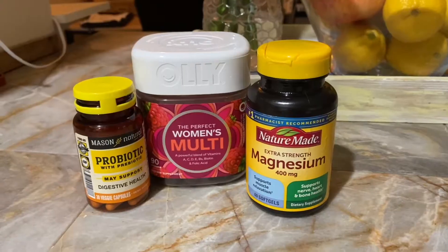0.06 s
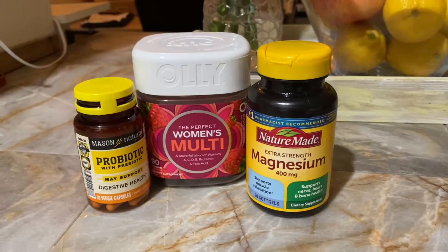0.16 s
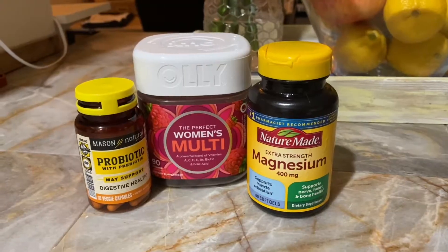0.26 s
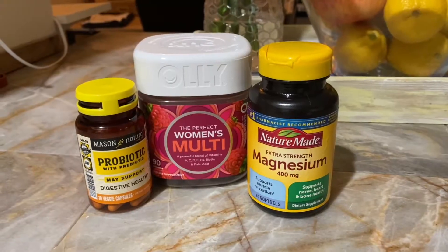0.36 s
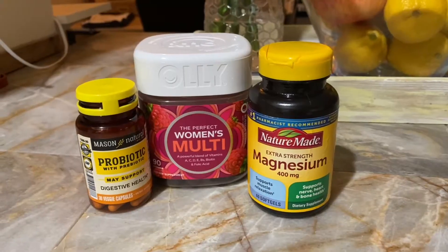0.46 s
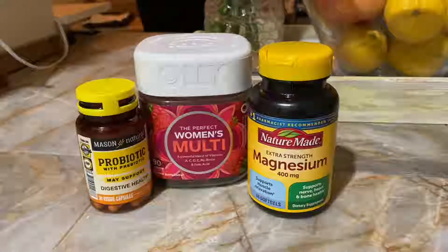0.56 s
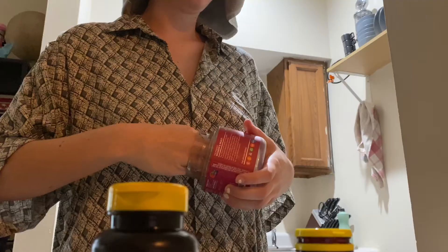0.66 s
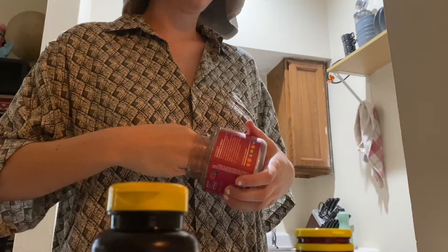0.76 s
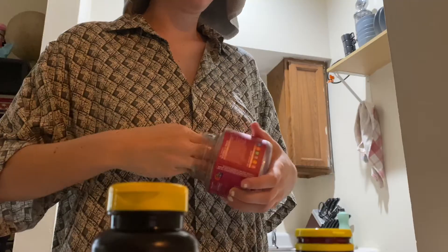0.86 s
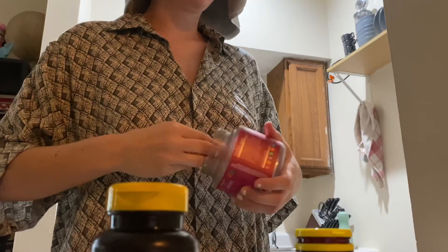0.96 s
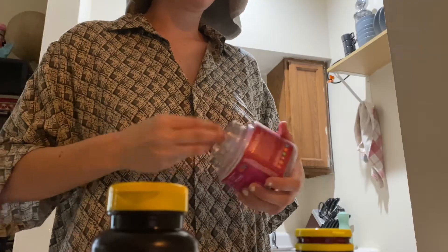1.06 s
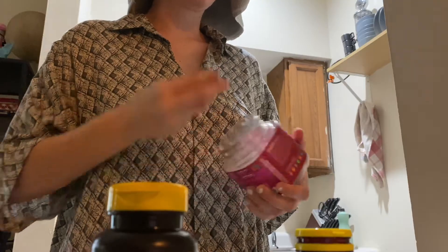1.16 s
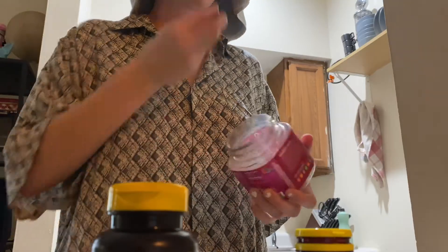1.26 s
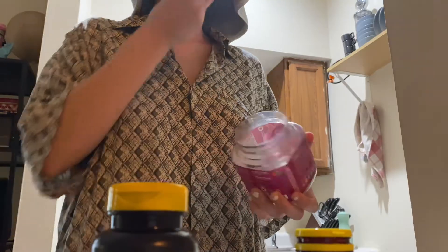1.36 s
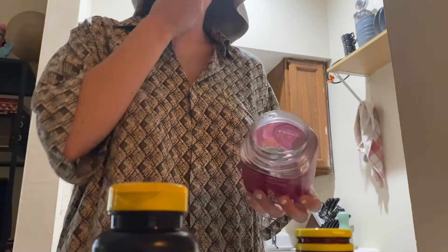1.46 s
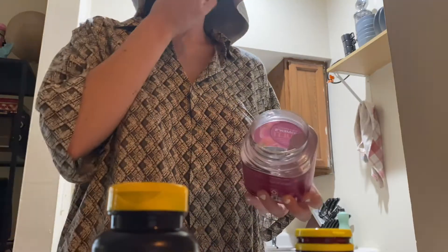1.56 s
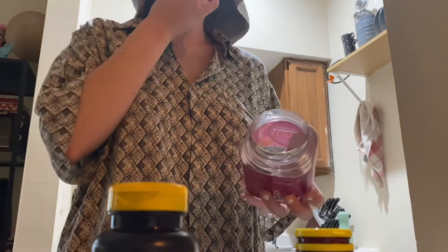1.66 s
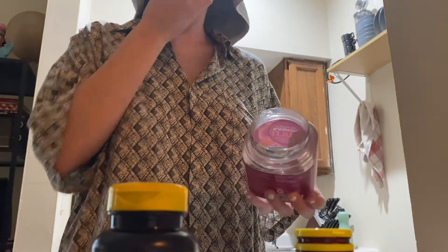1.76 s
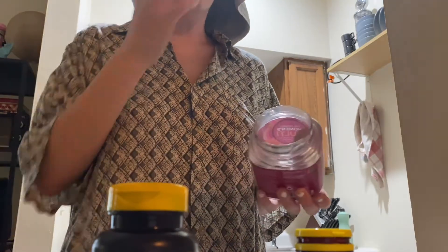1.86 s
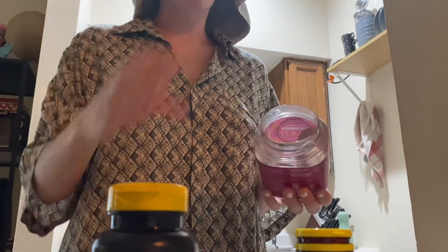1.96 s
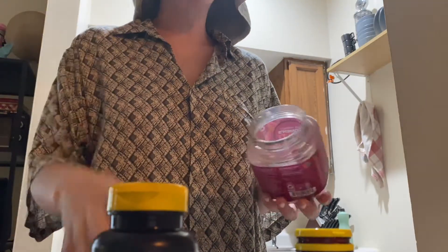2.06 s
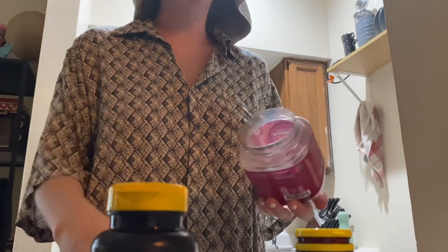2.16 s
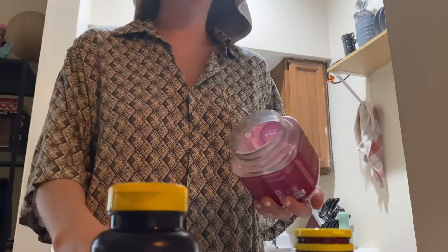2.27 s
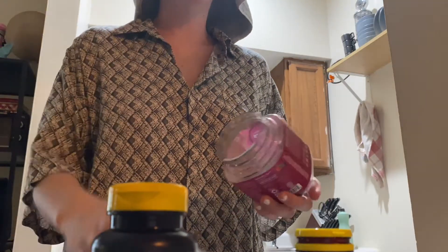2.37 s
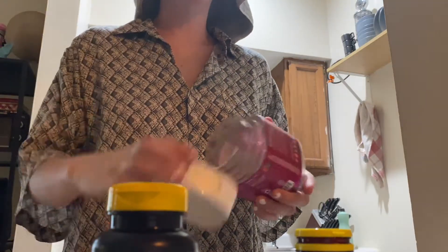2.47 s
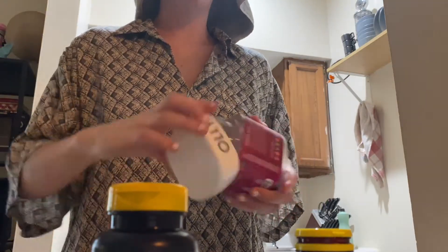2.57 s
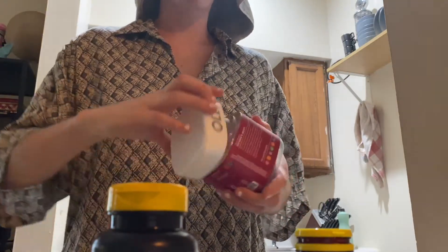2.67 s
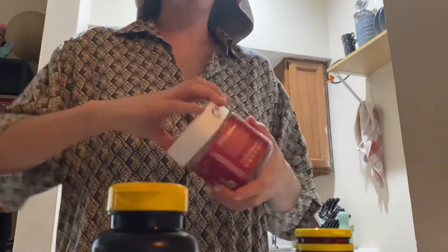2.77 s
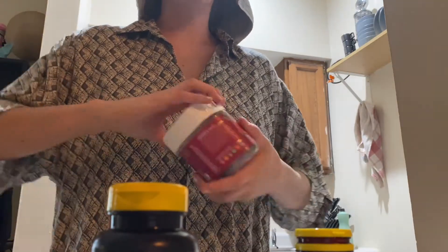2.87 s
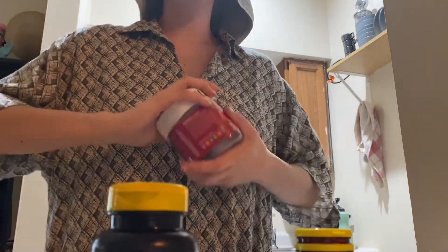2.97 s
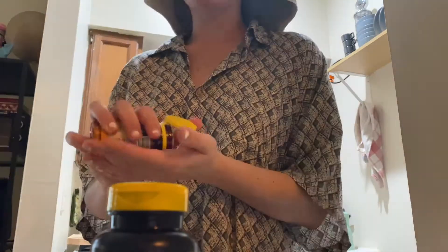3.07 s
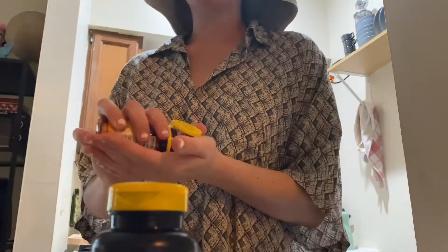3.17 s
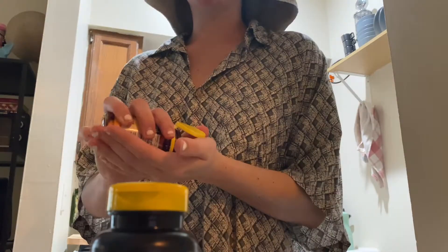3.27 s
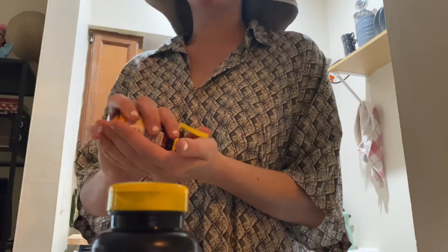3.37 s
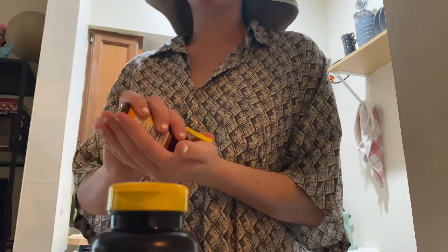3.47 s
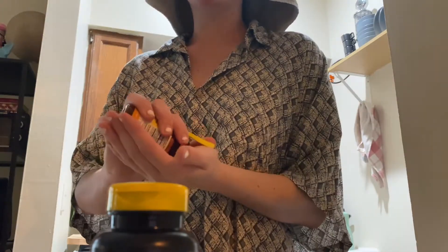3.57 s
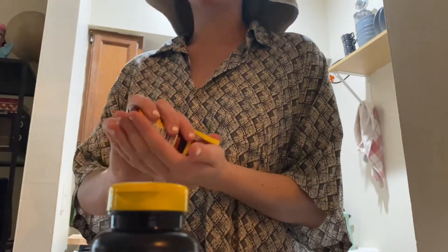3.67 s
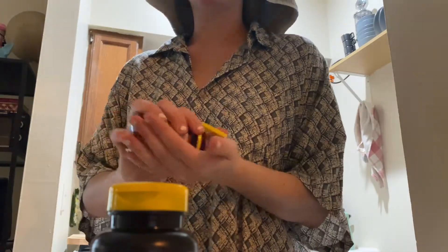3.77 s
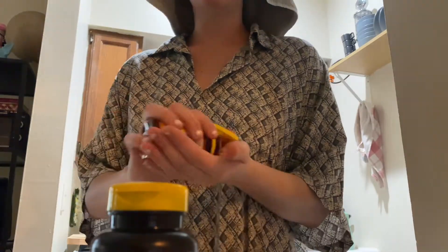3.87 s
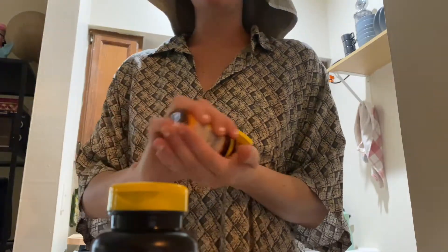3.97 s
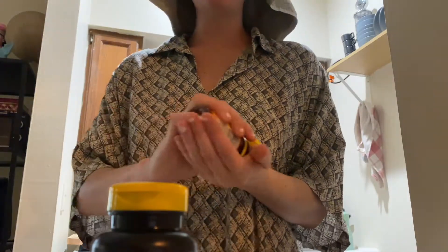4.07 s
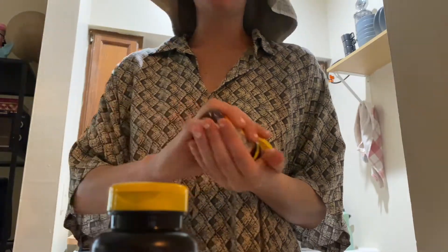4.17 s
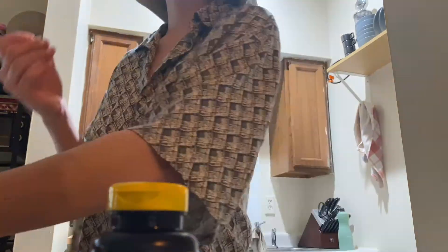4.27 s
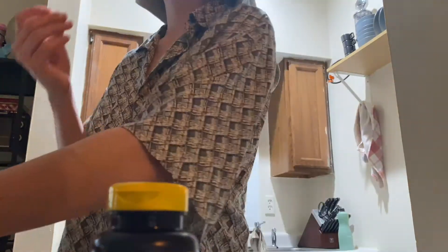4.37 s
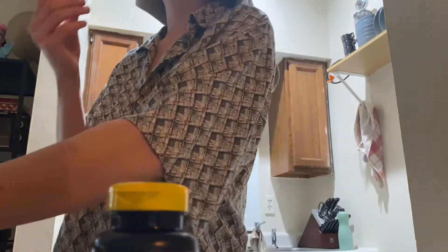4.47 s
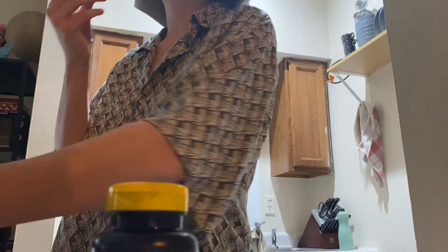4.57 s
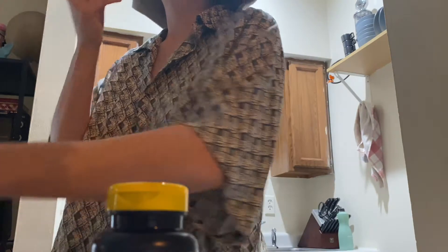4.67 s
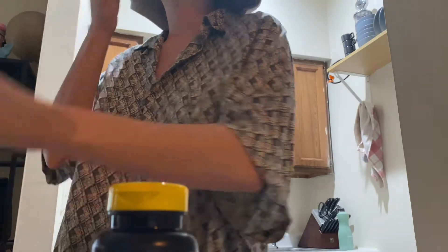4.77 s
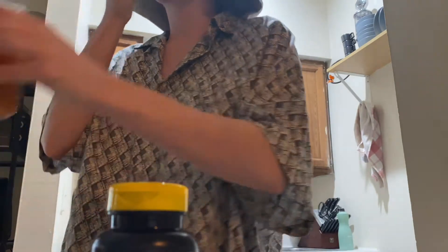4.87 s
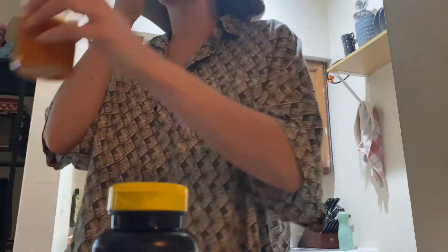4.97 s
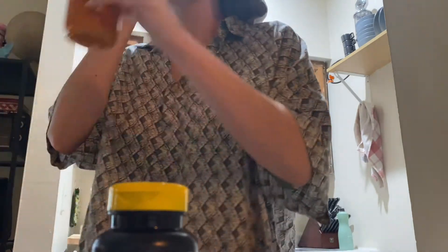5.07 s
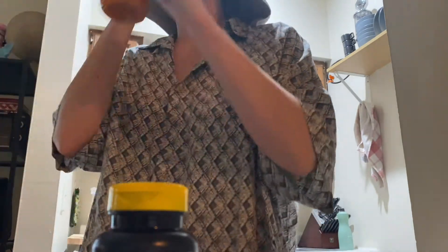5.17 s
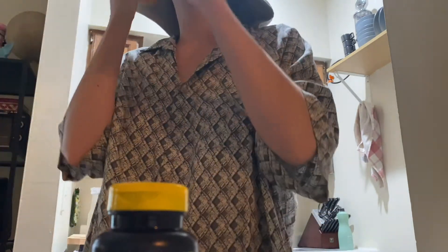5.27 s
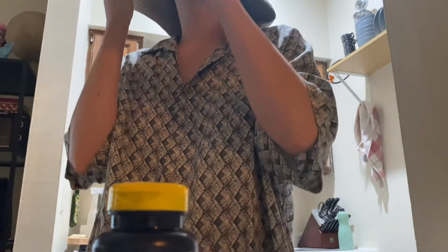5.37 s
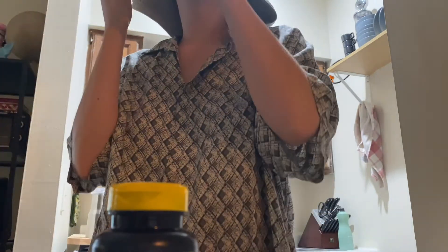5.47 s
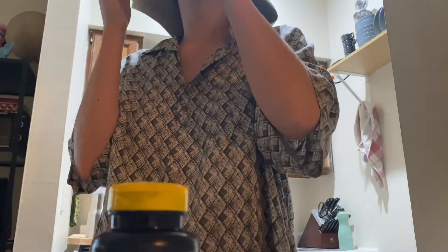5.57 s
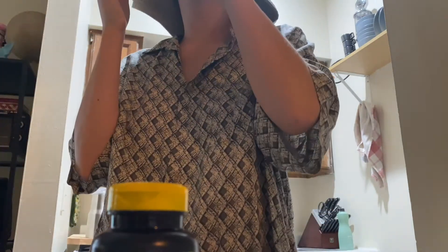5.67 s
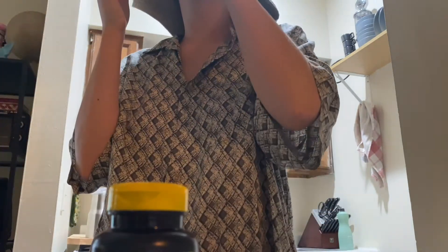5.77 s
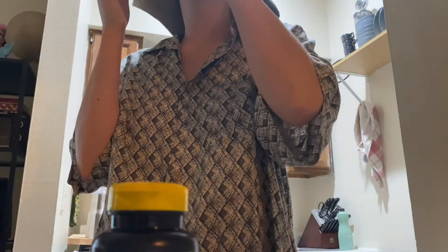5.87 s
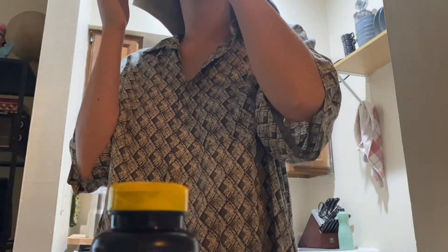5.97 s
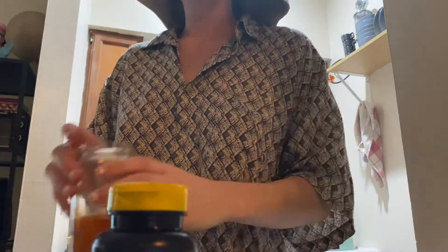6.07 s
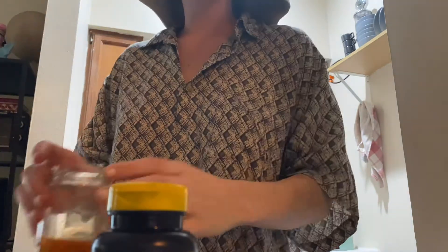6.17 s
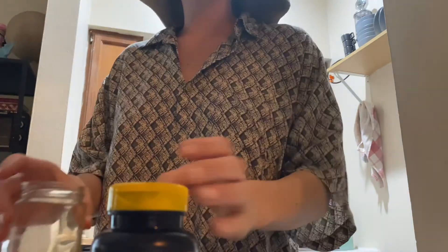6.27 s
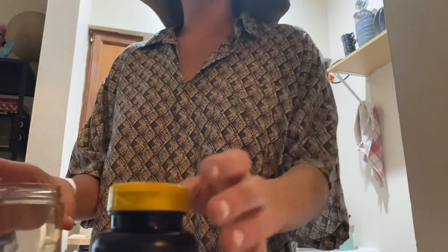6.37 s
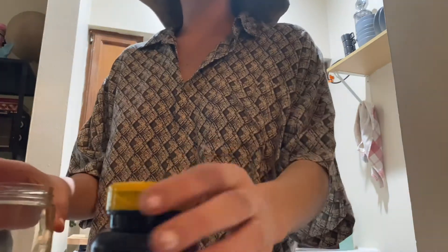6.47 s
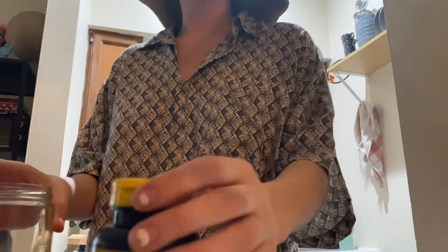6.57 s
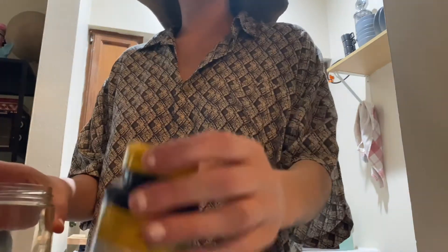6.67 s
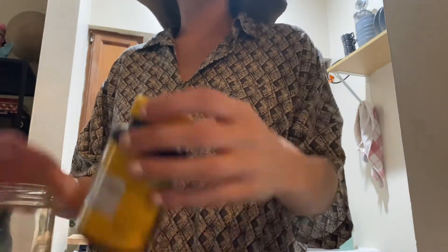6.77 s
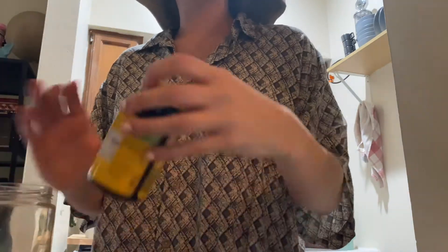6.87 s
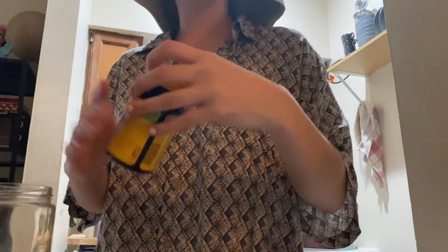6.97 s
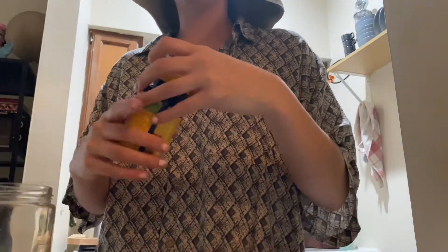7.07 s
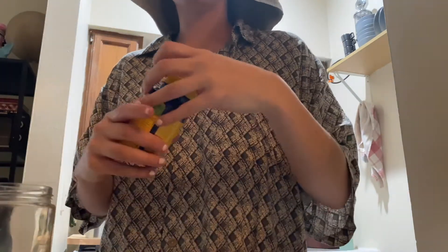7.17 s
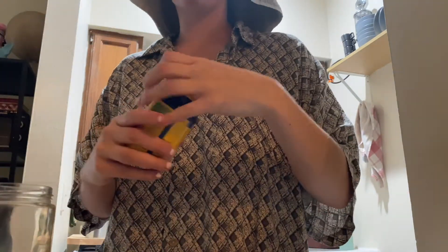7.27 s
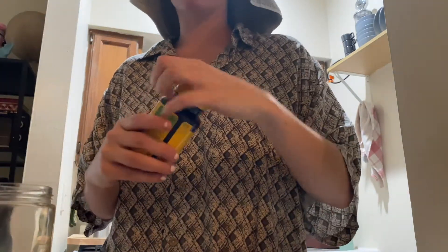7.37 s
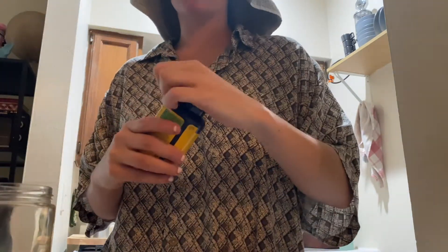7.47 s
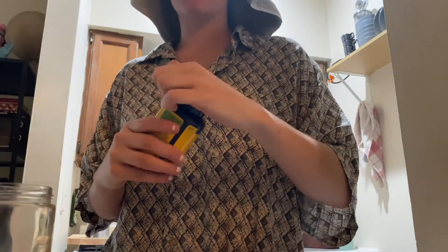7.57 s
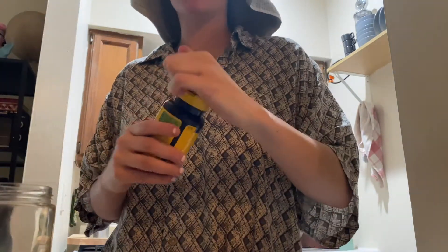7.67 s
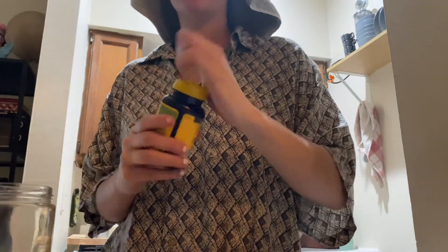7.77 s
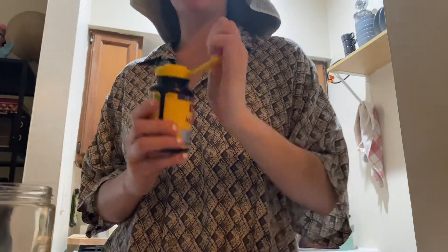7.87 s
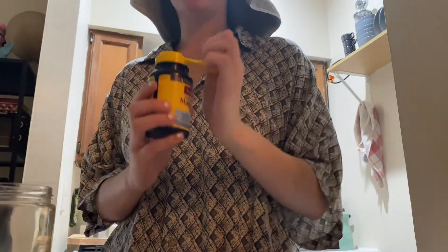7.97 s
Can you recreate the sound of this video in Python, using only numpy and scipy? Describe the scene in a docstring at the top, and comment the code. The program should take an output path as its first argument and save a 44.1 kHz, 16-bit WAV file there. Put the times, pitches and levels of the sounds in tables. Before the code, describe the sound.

Very quiet hissy air with faint cloth swishes; at about 0.57 s it switches abruptly to a fuller room tone with low, slightly wavering hum. Soft rubbing and deep bumps of a held plastic jar follow, with small hollow knocks around 1.6-2.2 s. At 2.44 s a lid claps on, loud and hollow, followed by knocks and threaded rubbing until about 2.9 s. From 3.0 s pills click and slide in a plastic bottle with a faint airy hollow tone, a clearer knock at 3.7 s. At 4.25 s a glass leaves stone with a dull scrape and thud, then near quiet. At 6.25 s it lands very hard: loud, slightly distorted clunk, boom, rattle, faint bright rim ring and a smaller settling bump at 6.4 s. Light pill ticks around 7 s, a sharp flip-cap snap at 7.55 s, then small rubs. Close stereo microphones, short kitchen reverberation.

```python
"""Quiet hissy kitchen air and cloth swishes; at 0.57 s the room tone switches to a fuller one: noise bands
plus wavering hum tones. Plastic jars are handled over stone, a lid claps on at 2.4 s: wall modes, crack,
gliding air tone, thumps. Pills click and slide at 3 s: filtered bursts, slip grains, noise-driven bottle air.
From 4.2 s a glass is lifted, at 6.25 s set down hard: modes, slab rattle, boom. Pills click again, a flip
cap snaps open at 7.5 s. Echoes and a diffuse tail reach two microphones; the loudest peaks clip."""
import sys
import numpy as np
from scipy import signal
from scipy.fft import rfft, irfft, next_fast_len
from scipy.io import wavfile

SR = 44100
rng = np.random.default_rng(int(sys.argv[2]) if len(sys.argv) > 2 else 0)


def log_audio(samples):
    """Write samples as a 16-bit WAV file to the path given in sys.argv[1]."""
    # one column per channel
    frames = np.atleast_2d(samples).T
    # limit to full scale, then quantise
    limited = np.clip(frames, -1, 1)
    pcm = np.round(limited * 32767).astype(np.int16)
    wavfile.write(sys.argv[1], SR, pcm)


N = 354123
T = np.arange(int(.5 * SR)) / SR  # time axis of one event
ATTACK = int(.015 * SR)  # samples over which event level is set


def amp(db):
    """Decibels to gain."""
    return 10 ** (np.asarray(db) / 20)


def unit(x, count=None):
    """Scale to rms 1 over the first count samples."""
    return x / np.sqrt(np.mean(x[:count] ** 2) + 1e-18)


def fade(t, t60):
    """Exponential decay, -60 dB at t60."""
    return np.exp(-np.log(1000) * t / t60)


def add(track, s, x):
    """Mix x into the track at s seconds."""
    i = max(int(s * SR), 0)
    track[i:i + len(x)] += x[:max(len(track) - i, 0)]


def band(x, hz, q):
    """One broad resonance."""
    hz = min(hz, SR / 3)
    return signal.lfilter(*signal.iirpeak(hz, max(q, 3 * hz / SR), fs=SR), x)


def soften(x, hz):
    """Low-pass: a soft contact lasts longer and leaves out the treble."""
    return signal.lfilter(*signal.butter(2, min(hz, SR / 3), fs=SR), x)


def thin(x, hz=62):
    """High-pass: small objects radiate almost no deep bass."""
    return signal.sosfilt(signal.butter(3, hz, "high", fs=SR, output="sos"), x)


def colour(x, points):
    """Causal minimum-phase filter through (f/Hz, level/dB) points."""
    hz, db = np.transpose(points)
    size = 4096
    grid_hz = np.fft.rfftfreq(size, 1 / SR)
    log_gain = np.log(amp(np.interp(np.log(grid_hz + 1), np.log(hz), db)))
    cepstrum = irfft(log_gain)[:size // 2]
    cepstrum[0] /= 2
    response = irfft(np.exp(rfft(2 * cepstrum, size)))
    return signal.fftconvolve(x, response)[:len(x)]


def ring(modes, scatter=0):
    """Damped modes of alternating sign; scatter is the relative random pitch shift by the grip."""
    out = 0
    for k, (hz, db, t60) in enumerate(modes):
        shifted_hz = hz * (1 + scatter * rng.standard_normal())
        out = out + (-1) ** k * amp(db) * fade(T, t60) * np.sin(2 * np.pi * shifted_hz * T)
    return out


def burst(t60):
    """Noise that dies away."""
    return rng.standard_normal(len(T)) * fade(T, t60)


def thud(modes, rise_s=.003):
    """Low modes set going by a soft push."""
    return unit(ring(modes) * (1 - np.exp(-T / rise_s)), ATTACK)


def friction(length, rate, spread_db):
    """A stroke of tiny slips (rate/s) of uneven size that swells and ebbs, then silence."""
    count = max(int(length * SR), ATTACK)
    slips = (rng.random(count) < rate / SR) * rng.standard_normal(count)
    slips = slips * amp(spread_db * np.minimum(rng.exponential(size=count), 3))
    return np.pad(slips * np.sqrt(np.hanning(count)), (0, len(T))), count


def air_noise(spectrum, db, shared_hz=330):
    """Steady air noise, level set above 200 Hz; the bass is alike on both sides."""
    bass = soften(rng.standard_normal(N), shared_hz)
    own = signal.lfilter(*signal.butter(2, shared_hz, "high", fs=SR), rng.standard_normal((2, N)))
    air = np.array([colour(bass + side, spectrum) for side in own])
    above_hum = signal.sosfilt(signal.butter(6, 200, "high", fs=SR, output="sos"), air)
    return amp(db) * air / above_hum.std()


# hissy opening air: f/Hz, relative density/dB
OPENING_SPECTRUM = [(18, -39), (30, -15), (73, 5), (185, -13), (837, -26), (1030, -14.5), (1110, -5.5),
                    (1480, -29), (2080, -27), (2310, -25), (2920, -43), (3500, -35), (3980, -37),
                    (7240, -31), (15000, -47)]
# room air with hum: f/Hz, relative density/dB
AIR_SPECTRUM = [(15, -53.5), (25, -24.5), (48, -20.5), (70, -5.5), (100, -12.5), (130, -10), (153, -15.5),
                (249, -24), (277, -28.5), (326, -22.5), (394, -31), (840, -34.5), (988, -25.5),
                (1290, -53.5), (10100, -52), (16000, -83.5)]
# hum tones: f/Hz, level/dB before HUM_DB
HUM_TONES = [(80.7, -68.5), (84, -64.5), (123.8, -58.5), (247.6, -78), (985, -78)]
# brief dips of the room tone: t/s
DIP_TIMES_S = [3.0, 4.205, 6.0]
OPENING_DB, AIR_DB = -66.5, -66.5  # AIR_DB before HUM_DB
HUM_START_S, HUM_DB = .57, 2  # switch time, gain of the whole fuller room tone
DIP_WIDTH_S, DIP_DB = 0.016, -17.5


def room_tone(whir_hz=1110, whir_q=5, whir_db=-72, hiss_hz=1950, hiss_q=2, hiss_db=-82):
    """Quiet hissy air, then fuller air with hum tones, whir and hiss bands; the level dips briefly."""
    t = np.arange(N) / SR
    whir = rng.standard_normal((2, N))
    for _ in range(2):
        whir = band(whir, whir_hz, whir_q)
    whir = np.array([unit(side) for side in whir])
    hum = 0
    for hz, db in HUM_TONES:
        wander_rad = 0.23 * unit(soften(rng.standard_normal(N), 3))
        hum = hum + amp(db) * np.sqrt(2) * np.sin(2 * np.pi * hz * t + wander_rad)
    hiss = rng.standard_normal((2, N))
    for _ in range(3):
        hiss = band(hiss, hiss_hz, hiss_q)
    hiss = np.array([unit(side) for side in hiss])
    switch = np.clip((t - HUM_START_S) / 0.0085, 0, 1)
    dips = sum(np.exp(-((t - s) / DIP_WIDTH_S) ** 2) for s in DIP_TIMES_S)
    course = switch * amp(HUM_DB + DIP_DB * dips)
    opening = air_noise(OPENING_SPECTRUM, OPENING_DB) * (1 - switch)
    tones_and_bands = amp(whir_db) * whir + amp(hiss_db) * hiss + hum
    return opening + course * (air_noise(AIR_SPECTRUM, AIR_DB) + tones_and_bands)


# kitchen reverberation bands: f/Hz, t60/s, level/dB before late_db
ROOM_BANDS = [(100, 0.46, -8.5), (308, 0.53, -7.5), (700, 0.83, -17), (1400, 0.24, -13), (2323, 0.44, -9.5),
              (3200, .5, -13), (5996, 0.38, -10.5), (14000, 0.88, -17)]


def kitchen(apart_hz=700):
    """Diffuse decaying noise at two microphones; long waves reach both alike."""
    t, hz = np.arange(SR) / SR, np.fft.rfftfreq(SR, 1 / SR)
    centres = np.log([row[0] for row in ROOM_BANDS])
    mid, side = rfft(rng.standard_normal((2, SR)))
    likeness = np.exp(-(hz / apart_hz) ** 2)
    noise = mid * np.sqrt((1 + likeness) / 2) + np.array([side, -side]) * np.sqrt((1 - likeness) / 2)
    tail = 0
    for share, (_, t60, db) in zip(np.eye(len(ROOM_BANDS)), ROOM_BANDS):
        shape = fade(t, t60) * np.clip((t - .006) / .015, 0, 1)
        banded = irfft(noise * np.interp(np.log(hz + 1), centres, share), SR)
        tail = tail + amp(db) * banded * shape / np.linalg.norm(shape)
    return tail


def place(x, lag, pan_db, early_db, late_db, early_t60=.1, count=40):
    """Direct sound, quick echoes off counter and cupboards, then the tail; lag is left delay in samples."""
    hz = np.fft.rfftfreq(SR, 1 / SR)
    left = irfft(np.exp(-2j * np.pi * hz * (lag + 1) / SR), SR) * amp(pan_db / 2)
    right = signal.unit_impulse(SR, 1) * amp(-pan_db / 2)
    direct = np.array([left, right])
    direct[:, SR // 2:] = 0
    echoes = np.zeros((2, SR))
    for when, bearing, size in rng.uniform(-1, 1, (count, 3)):
        s = .002 + .02 * (when + 1)
        echo = np.array([np.sign(size) * fade(s, early_t60)])
        for side, extra_s in zip(echoes, (0, bearing * 0.00064)):  # each echo has its own direction
            add(side, s + extra_s, echo)
    early = amp(early_db) * echoes / np.linalg.norm(echoes[0])
    response = direct + early + amp(late_db) * kitchen()
    return signal.fftconvolve(x[None], response, axes=1)[:, :N]


def standing_wave(pair, radians, hz, octaves):
    """A standing wave over the counter turns the phase between the microphones in one low band."""
    size = next_fast_len(N + len(T))
    distance = np.log2((np.fft.rfftfreq(size, 1 / SR) + 1) / hz) / octaves
    turn = radians * np.exp(-distance ** 2)
    return irfft(rfft(pair, size) * np.exp(.5j * np.array([turn, -turn])), size)[:, :N]


# Event levels below are before place().
# soft dull rustles: t/s, rise/s, t60/s, level/dB
RUSTLE_EVENTS = [(0.564, 0.029, 0.69, -50), (.9, 0.072, 1, -55.5), (1.735, 0.028, 0.42, -29.5),
                 (2.49, 0.036, 0.67, -35.5), (2.645, 0.051, 0.076, -32)]
# rustle spectrum: f/Hz, relative level/dB
RUSTLE_SPECTRUM = [(40, -2.5), (100, 4), (200, 5.5), (400, 7), (900, 5), (1500, -9), (2400, -16.5),
                   (4000, -38.5), (12000, -43)]
# soft deep bumps: t/s, level/dB
BUMP_EVENTS = [(.985, -40), (1.776, -34), (1.905, -35.5), (1.959, -36.5)]
# the lid seats and the whole jar thumps in the hand: t/s, f/Hz, level/dB
THUMP_EVENTS = [(2.441, 352, -34.5), (2.51, 383, -25.5), (2.654, 303, -25.5), (2.685, 228, -35),
                (7.546, 203, -31), (7.552, 363, -36.5)]
BUMP_HZ, BUMP_T60_S, THUMP_T60_S = 92, .23, .035


def handling():
    """Dull rustles as shaped noise; bumps and jar thumps as damped low modes."""
    out = np.zeros(N)
    for s, rise, t60, db in RUSTLE_EVENTS:
        swell = np.minimum(T / rise, 1) * fade(np.maximum(T - rise, 0), t60)
        rustle = unit(colour(rng.standard_normal(len(T)), RUSTLE_SPECTRUM))
        add(out, s, amp(db) * swell * rustle)
    for s, db in BUMP_EVENTS:
        add(out, s, amp(db) * thud([(BUMP_HZ, 0, BUMP_T60_S)], rise_s=.008))
    for s, hz, db in THUMP_EVENTS:
        add(out, s, amp(db) * thud([(hz, 0, THUMP_T60_S)]))
    return out


# contact crack of plastic, also for ticks and knocks: f/Hz, relative level/dB
CRACK_SPECTRUM = [(200, 3), (900, 10.5), (2500, -1.5), (5000, -5.5), (7500, -2), (10000, -4), (14500, -8.5),
                  (16000, -18.5)]
# sleeves swishing: start t/s, length/s, level/dB, centre f/Hz
SWISH_STROKES = [(0, 0.099, -65.5, 3620), (.41, 0.074, -64, 3730), (.562, 0.098, -51, 1850),
                 (2.15, 0.078, -45, 1770)]
# fingers and caps sliding on plastic: start t/s, length/s, level/dB, centre f/Hz
RUB_STROKES = [(.755, 0.15, -76.5, 14000), (1.026, 0.029, -64.5, 2390), (1.2, 0.22, -70.5, 4860),
               (2.475, .11, -44.5, 1680), (2.615, 0.13, -44, 1410), (2.88, 0.12, -55, 1340),
               (3.005, 0.15, -49, 3560), (3.4, 0.1, -64, 3240), (3.8, 0.16, -74, 9420),
               (4.735, 0.079, -62.5, 7900), (6.975, 0.067, -48, 2920), (7.184, 0.068, -58.5, 2710),
               (7.363, 0.099, -60.5, 2120), (7.756, 0.071, -66.5, 3200), (7.92, 0.094, -52.5, 2850)]
SWISH_EDGE_HZ, RUB_EDGE_HZ = 6000, 14500  # low-pass cut-offs


def rubs(strokes, edge_hz, q=0.97, spread_db=2.5):
    """Skin, cloth and cap threads slip over the plastic in dense grains."""
    out = np.zeros(N)
    for start, length, db, hz in strokes:
        slips, count = friction(length, 3000, spread_db)
        stroke = band(colour(slips, CRACK_SPECTRUM), hz, q)
        stroke = soften(soften(stroke, edge_hz), edge_hz)
        add(out, start, amp(db) * unit(stroke, count))
    return out


# pills, nails and cap threads: t/s, level/dB, centre f/Hz
TICK_EVENTS = [(1.117, -65, 2380), (1.196, -62.5, 7150), (1.459, -69.5, 4960), (1.708, -54, 7500),
               (2.503, -38, 6100), (2.556, -39, 1880), (2.575, -38, 3500), (2.616, -38.5, 4960),
               (3.022, -36, 4900), (3.037, -36, 4930), (3.09, -43.5, 3730), (3.512, -53.5, 3320),
               (3.61, -49, 4860), (3.721, -46, 3817), (4.728, -53.5, 8590), (6.988, -46, 1390),
               (7.018, -40.5, 3050), (7.056, -43, 3300), (7.104, -47.5, 3240), (7.227, -52, 2090),
               (7.335, -44.5, 2000), (7.368, -40, 3270), (7.382, -40, 2560), (7.554, -27.5, 1500),
               (7.559, -31, 2380), (7.622, -41.5, 1880), (7.987, -43, 2020)]


def ticks(t60=0.013, q=2.5, crack_db=-4, buzz_db=-17, buzz_t60=.05):
    """Small hard contacts: a sharp snap and a brief buzz through one broad resonance."""
    out = np.zeros(N)
    for s, db, hz in TICK_EVENTS:
        contact = colour(burst(t60) + amp(buzz_db) * burst(buzz_t60), CRACK_SPECTRUM)
        tick = unit(band(contact, hz, q), ATTACK) + amp(crack_db) * unit(contact, ATTACK)
        add(out, s, amp(db) * unit(tick, ATTACK))
    return out


# air in the open bottle; the palm over its mouth lowers the pitch: t/s, f/Hz, level/dB
BOTTLE_AIR_COURSE = [(3.02, 725, -69), (3.045, 716, -43.5), (3.12, 685, -58.5), (3.26, 650, -80),
                     (3.331, 631, -66), (3.39, 590, -77), (3.45, 570, -62.5), (3.63, 581, -78.5),
                     (3.761, 660, -62.5), (3.84, 668, -60), (3.92, 668, -80)]


def bottle_air(width_hz=14):
    """Sliding pills keep the narrow air resonance sounding: slow noise modulates a gliding tone."""
    t = np.arange(N) / SR
    s, hz, db = np.transpose(BOTTLE_AIR_COURSE)
    in_phase = unit(soften(rng.standard_normal(N), width_hz))
    quadrature = unit(soften(rng.standard_normal(N), width_hz))
    phase = 2 * np.pi * np.cumsum(np.interp(t, s, hz)) / SR
    tone = np.real((in_phase + 1j * quadrature) * np.exp(1j * phase))
    return tone * np.interp(t, s, amp(db), left=0, right=0)


# glass standing on the counter: f/Hz, relative level/dB, t60/s
GLASS_MODES = [(372.7, -10.5, 0.12), (518, -5, 0.05), (591.4, -8.5, 0.045), (793, 0.5, 0.056),
               (872, 2, 0.081), (991.5, -2, 0.051), (1266, 5, 0.011), (1480, -0.5, 0.02),
               (1746, -5.5, 0.047), (1960, -2.5, 0.012), (2080, -2, 0.015), (2303, -7.5, .03),
               (2877, -16.5, 0.081), (4320, -25.5, .1), (5180, -33, .2)]
# thin ring of its rim: f/Hz, relative level/dB, t60/s
RIM_MODES = [(2878, -14.5, 0.22), (4420, -19, .13), (5270, -11, 0.12), (7180, -16.5, .08),
             (8880, 0.5, 0.078), (9940, 6.5, .11), (10300, 5.5, .07), (10700, -6, 0.089), (13500, -2, .05)]
# dense rattle of the slab: f/Hz, relative level/dB
SLAB_SPECTRUM = [(60, 2), (130, -6), (200, -11.5), (400, 3.5), (800, 8), (1200, 1), (1800, -3.5),
                 (2800, -13.5), (4500, -19), (9000, -20.5)]
# glass against the stone: t/s, level/dB, contact cut-off f/Hz
GLASS_BLOWS = [(4.253, -38, 736), (4.329, -28.5, 950), (4.367, -40, 900), (6.2475, -7, 3060),
               (6.252, -9, 790), (6.276, -19, 1300), (6.416, -24.5, 1270)]
# the counter booms under the weight of the glass: t/s, f/Hz, level/dB
COUNTER_BOOMS = [(4.33, 554, -25), (6.251, 128, -19), (6.253, 285, -25), (6.413, 128.5, -29.5)]
# rim clinks: t/s, level/dB
RIM_CLINKS = [(4.334, -69.5), (6.2472, -44), (6.321, -51.5), (6.475, -54), (6.65, -72.5)]
# glass sliding and chattering: start t/s, length/s, level/dB, contact cut-off f/Hz
GLASS_STROKES = [(4.23, 0.072, -45, 900), (4.332, 0.074, -36, 876), (6.218, 0.047, -42, 1800),
                 (6.259, 0.065, -29.5, 2000), (6.372, 0.13, -31, 950)]
BOOM_T60_S = 0.055


def glass(rim_slide_db=-34, slab_db=-1, slab_t60=0.039, slab_slide_db=1):
    """Blows and stick-slip chatter ring glass and slab; returns the clunk and the thin song of the rim."""
    clunk, song = np.zeros((2, N))
    body, rim = unit(ring(GLASS_MODES), ATTACK), unit(ring(RIM_MODES), ATTACK)
    for s, db, hz in GLASS_BLOWS:
        slab = unit(colour(burst(slab_t60), SLAB_SPECTRUM), ATTACK)
        blow = body + amp(slab_db) * slab
        add(clunk, s, amp(db) * unit(soften(blow, hz), ATTACK))
    for s, hz, db in COUNTER_BOOMS:
        add(clunk, s, amp(db) * thud([(hz, 0, BOOM_T60_S)]))
    for s, db in RIM_CLINKS:
        add(song, s, amp(db) * rim)
    for start, length, db, hz in GLASS_STROKES:
        slips, count = friction(length, rate=1500, spread_db=1.5)
        glass_part = unit(signal.fftconvolve(slips, body)[:len(slips)], count)
        slab_part = unit(colour(slips, SLAB_SPECTRUM), count)
        chatter = glass_part + amp(slab_slide_db) * slab_part
        add(clunk, start, amp(db) * unit(soften(chatter, hz), count))
        add(song, start, amp(db + rim_slide_db) * unit(signal.fftconvolve(slips, rim), count))
    return thin(clunk), song


# plastic wall modes: f/Hz before scatter, relative level/dB, t60/s
WALL_MODES = [(1081, 0.5, .016), (1260, -3, 0.015), (1480, -1.5, 0.012), (1652, -8, 0.022),
              (1816, -6.5, 0.014), (1985, -5.5, 0.015), (2410, -3.5, 0.018), (2610, -13.5, 0.011),
              (2830, -8.5, 0.012), (3482, -9, 0.0065), (4226, -14, 0.0088)]
# plastic knocks: t/s, air level/dB, settled air f/Hz, air t60/s, wall level/dB
KNOCK_EVENTS = [(1.582, -44.5, 733, 0.012, -72), (1.59, -34.5, 745, 0.015, -72.5),
                (1.673, -38, 580, 0.0041, -50.5), (1.712, -43, 630, 0.012, -53.5),
                (2.171, -40, 856.5, 0.033, -36.5), (2.197, -39, 720, 0.0047, -48.5),
                (2.437, -7.5, 706, 0.023, -17.5), (2.48, -18.5, 687, 0.027, -33.5),
                (2.507, -23.5, 592, 0.02, -36), (2.516, -25, 673, 0.052, -31),
                (2.616, -33, 665, 0.044, -27), (2.653, -24, 633, 0.016, -31.5),
                (2.684, -29.5, 712, 0.014, -30), (2.866, -41, 886, .021, -39.5),
                (2.92, -42.5, 738, 0.016, -63), (3.722, -29, 665, 0.046, -45.5),
                (4.583, -49.5, 805, .03, -78.5), (6.898, -54.5, 917, .015, -75.5),
                (6.916, -53, 915, .016, -84), (7.543, -36.5, 656, .03, -33),
                (7.553, -35.5, 514, 0.038, -34.5)]
CRACK_DB = -11.5  # against the wall


def knocks(glide=0.25, glide_s=0.0024, rise_s=0.0014, bounce_db=-9, bounce_t60=0.034,
           crack_t60=0.027, crack_rise_s=0.00057):
    """Each knock cracks, rings the wall and pumps the jar's air, whose pitch sinks as the gap closes."""
    out = np.zeros(N)
    for s, air_db, hz, t60, wall_db in KNOCK_EVENTS:
        pitch_hz = hz * (1 + glide * np.exp(-T / glide_s))
        air = np.sin(2 * np.pi * np.cumsum(pitch_hz) / SR)
        air = air * fade(T, t60) * (1 - np.exp(-(T / rise_s) ** 2))
        # a rim never lands flat: tiny contacts follow the first
        bounces = burst(bounce_t60) * (rng.random(len(T)) < .025)
        contacts = signal.unit_impulse(len(T)) + amp(bounce_db) * bounces
        wall = signal.fftconvolve(contacts, ring(WALL_MODES, scatter=0.099))[:len(T)]
        crack = colour(burst(crack_t60) * (1 - np.exp(-T / crack_rise_s)), CRACK_SPECTRUM)
        shell = unit(wall, ATTACK) + amp(CRACK_DB) * unit(crack, ATTACK)
        add(out, s, amp(air_db) * unit(air, ATTACK) + amp(wall_db) * shell)
    return thin(out)


def scene():
    """Jars in the hands, the glass on the counter, the kitchen around them."""
    clunk, song = glass()
    slides = rubs(RUB_STROKES, RUB_EDGE_HZ) + rubs(SWISH_STROKES, SWISH_EDGE_HZ)
    bumps = place(thin(handling()), lag=7.4, pan_db=0.5, early_db=-3, late_db=-2.0)
    fingers = place(ticks() + slides, lag=8.69, pan_db=2.5, early_db=-2, late_db=0.0)
    tumbler = place(clunk, lag=16.3, pan_db=2.4, early_db=-5.5, late_db=1.5)
    rim = place(song, lag=13, pan_db=0.5, early_db=2.5, late_db=4.5)
    jars = place(knocks() + bottle_air(), lag=8, pan_db=3, early_db=-4, late_db=2.5)
    hands = standing_wave(jars + fingers + bumps, radians=1.8, hz=386.7, octaves=0.22)
    tumbler = standing_wave(tumbler, radians=1.3, hz=239, octaves=.45)
    return room_tone() + hands + tumbler + rim


# left microphone against the right: f/Hz, level/dB
PORT_DIFFERENCE = [(60, 1.5), (110, -0.5), (200, -1.5), (380, 1), (700, 3.5), (1290, -0.5), (2380, -0.5),
                   (4400, 4), (8120, -0.5), (15000, 0.0)]
TOP_HZ = 15900  # low-pass edge


def record(dry, notch_hz=12300, notch_q=5):
    """Each microphone port has its own colour, both swallow a treble band; the loudest peaks clip."""
    pair = []
    for x, sign in zip(dry, (1, -1)):
        pair.append(colour(x, [(hz, sign * db / 2) for hz, db in PORT_DIFFERENCE]))
    ported = signal.lfilter(*signal.iirnotch(notch_hz, notch_q, fs=SR), np.array(pair))
    clipped = ported / (1 + ported ** 8) ** (1 / 8)
    return signal.sosfilt(signal.ellip(8, .2, 70, TOP_HZ, fs=SR, output="sos"), clipped)


dry = scene()
out = record(dry)
log_audio(out)
```